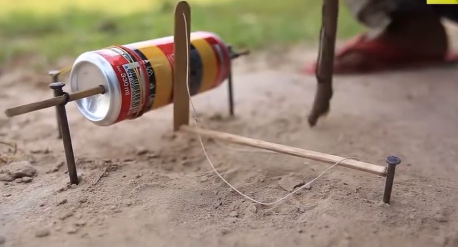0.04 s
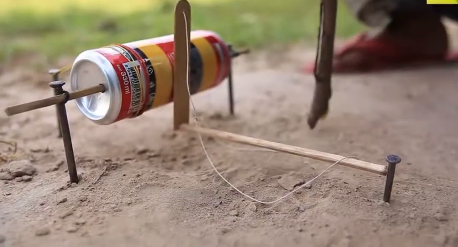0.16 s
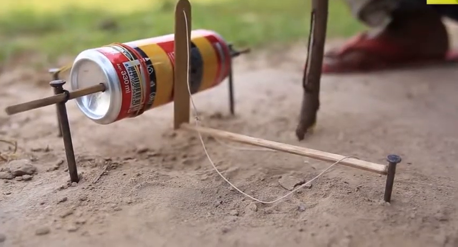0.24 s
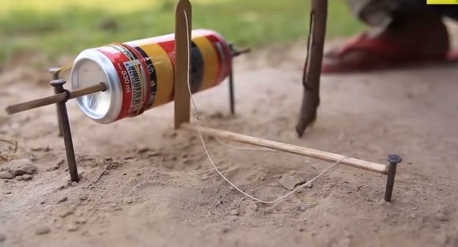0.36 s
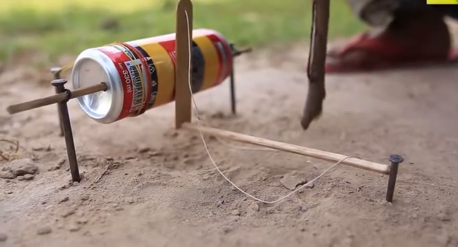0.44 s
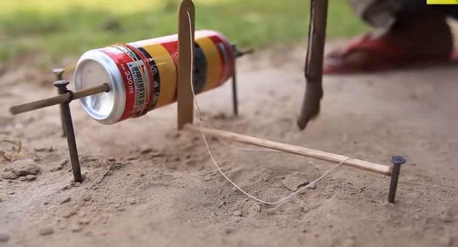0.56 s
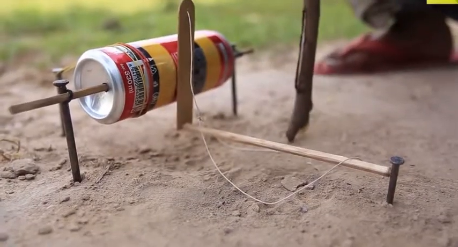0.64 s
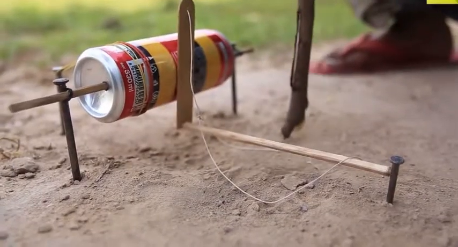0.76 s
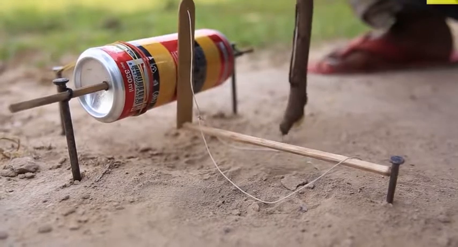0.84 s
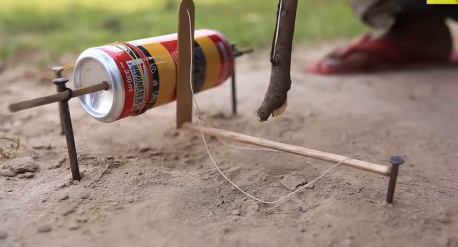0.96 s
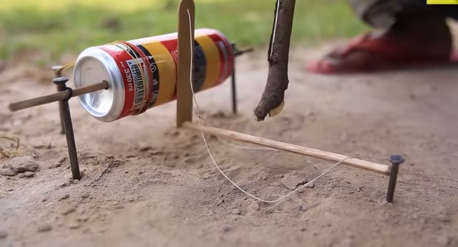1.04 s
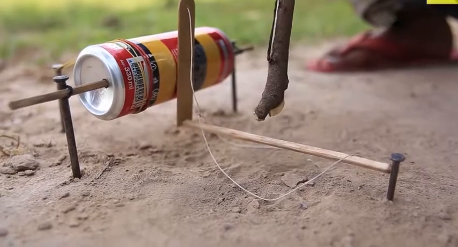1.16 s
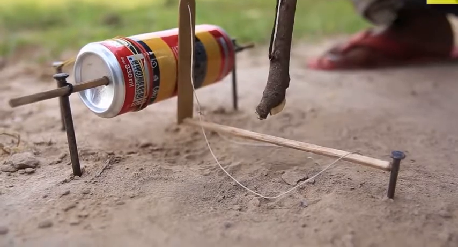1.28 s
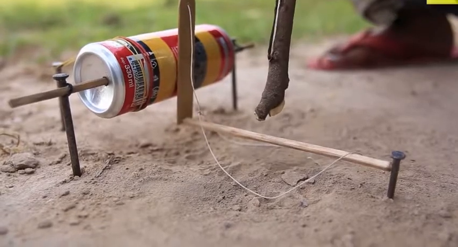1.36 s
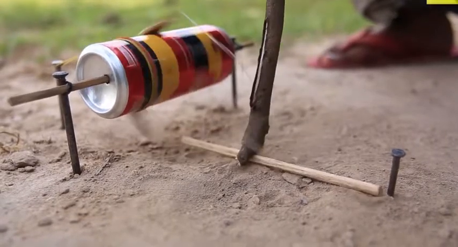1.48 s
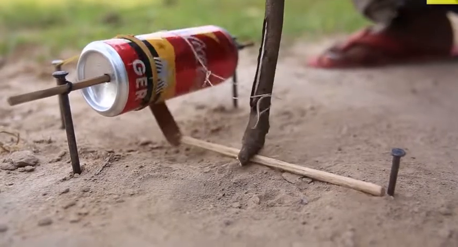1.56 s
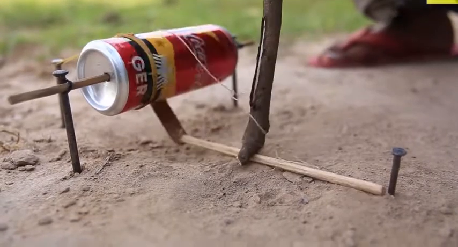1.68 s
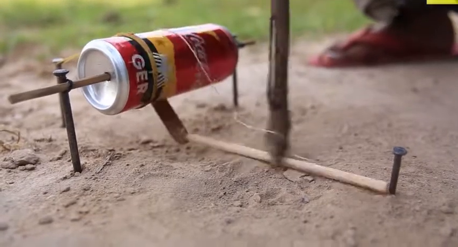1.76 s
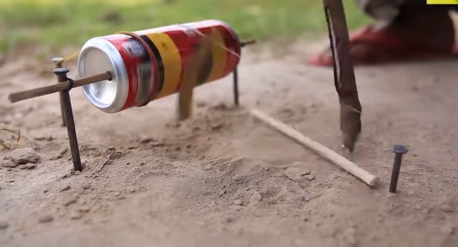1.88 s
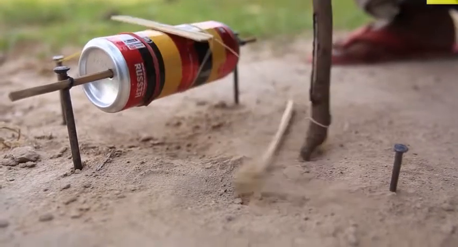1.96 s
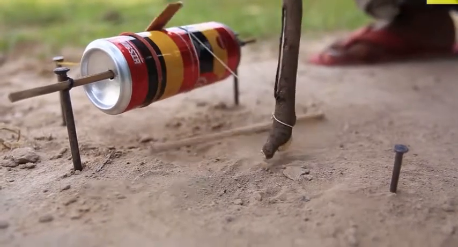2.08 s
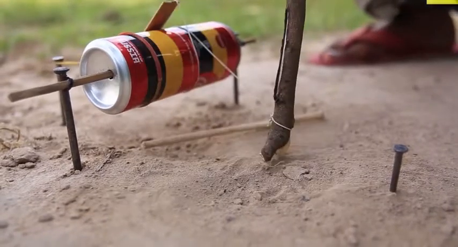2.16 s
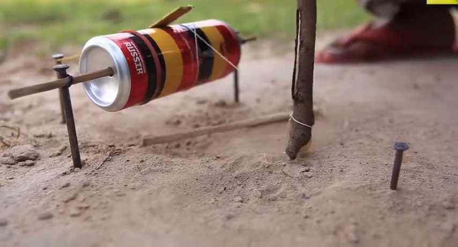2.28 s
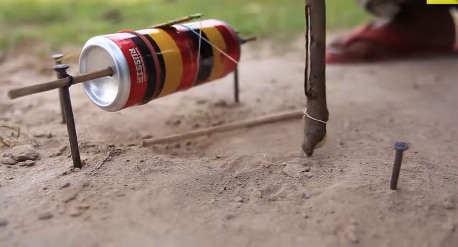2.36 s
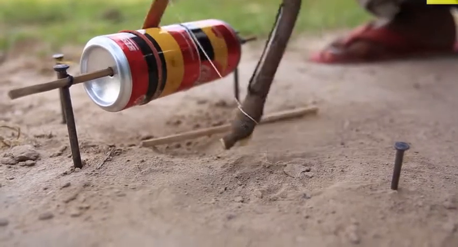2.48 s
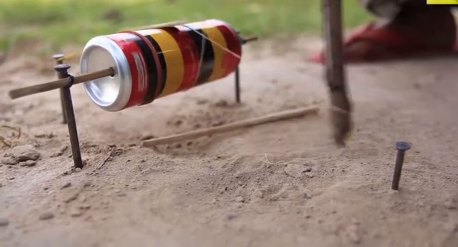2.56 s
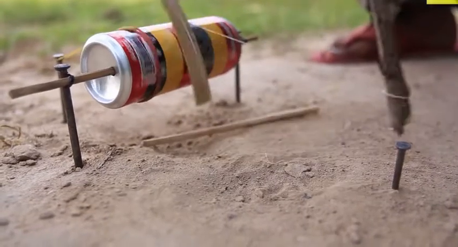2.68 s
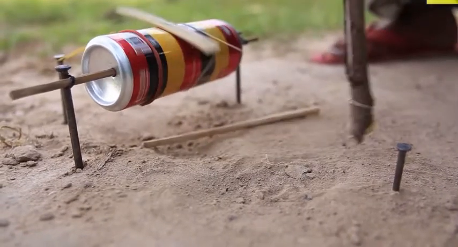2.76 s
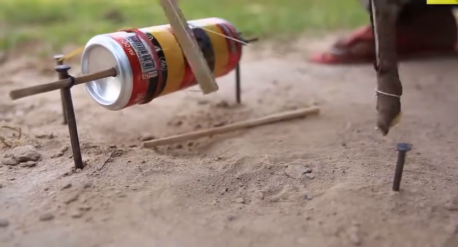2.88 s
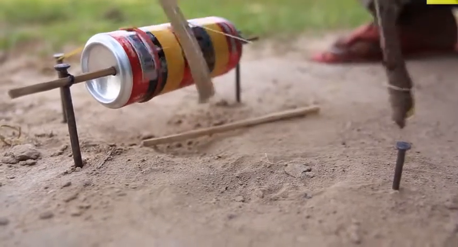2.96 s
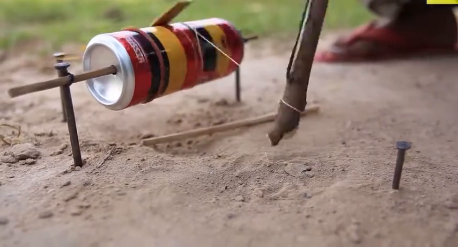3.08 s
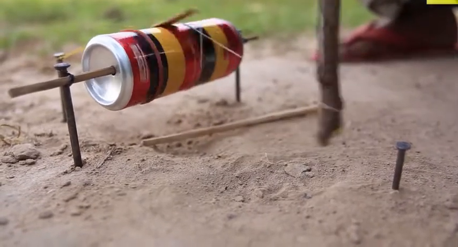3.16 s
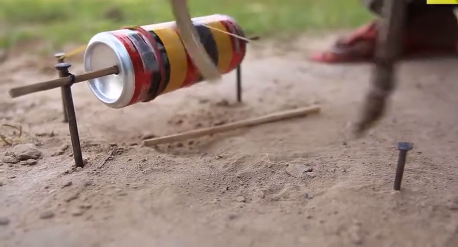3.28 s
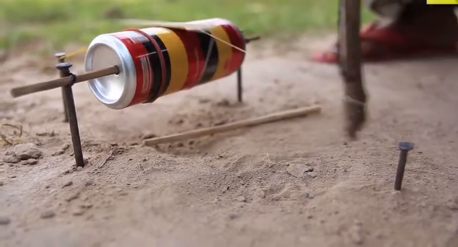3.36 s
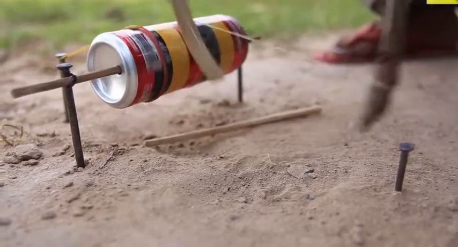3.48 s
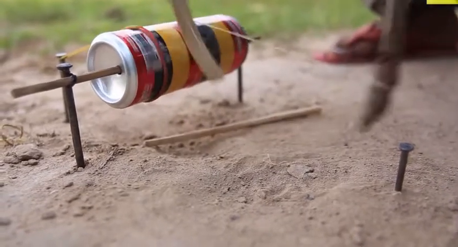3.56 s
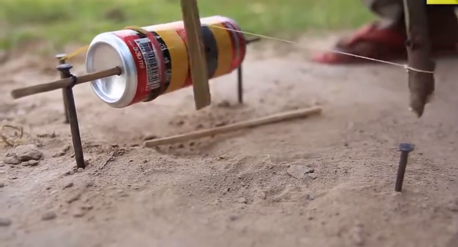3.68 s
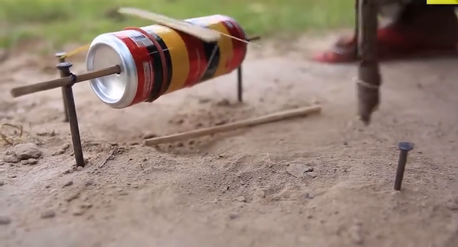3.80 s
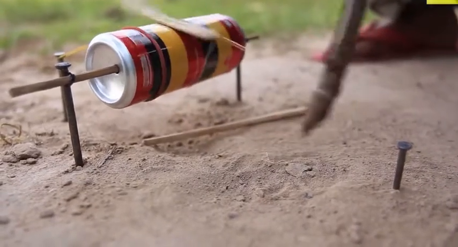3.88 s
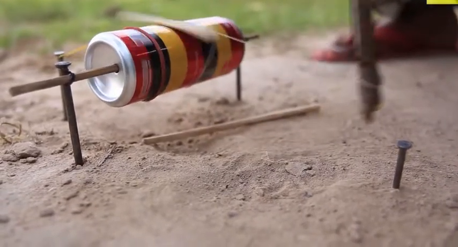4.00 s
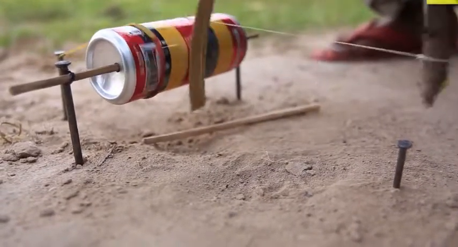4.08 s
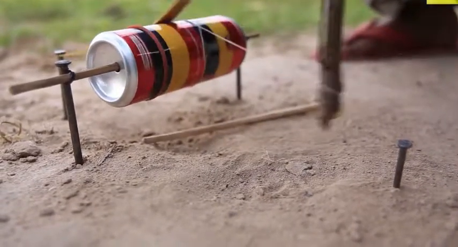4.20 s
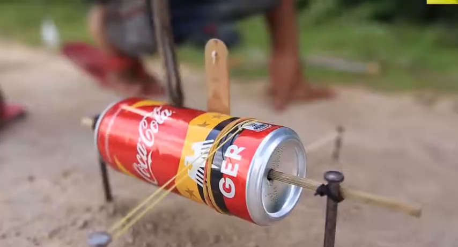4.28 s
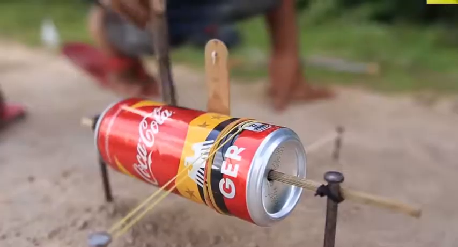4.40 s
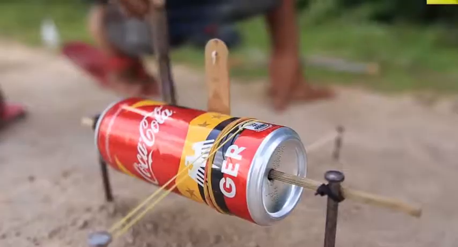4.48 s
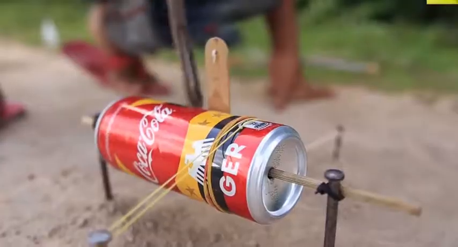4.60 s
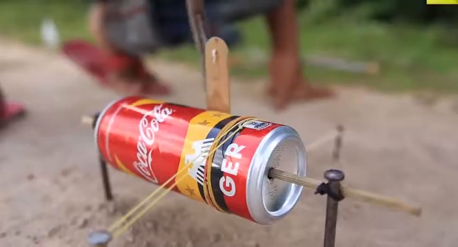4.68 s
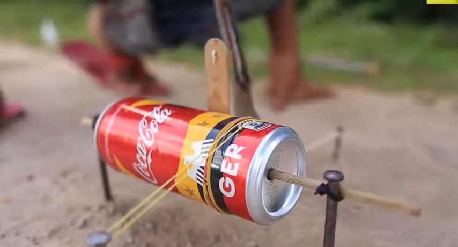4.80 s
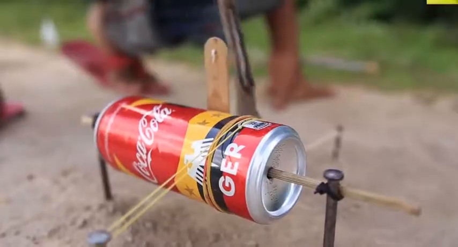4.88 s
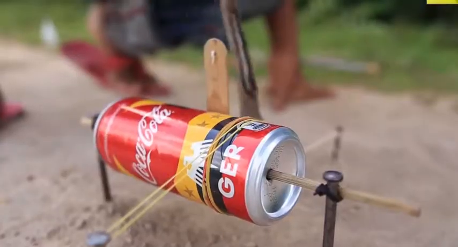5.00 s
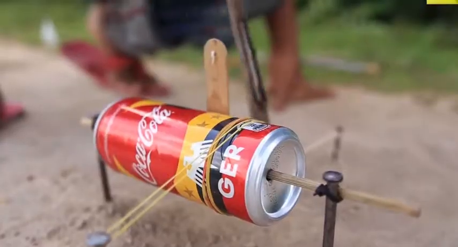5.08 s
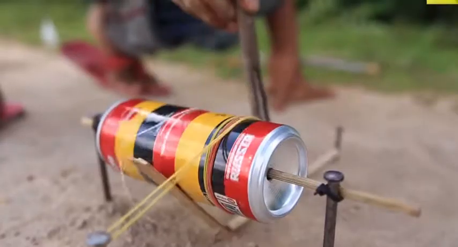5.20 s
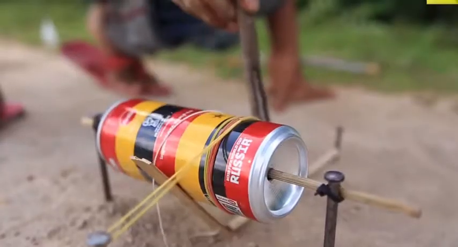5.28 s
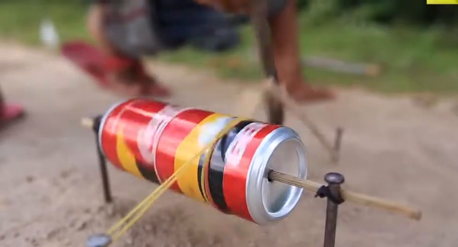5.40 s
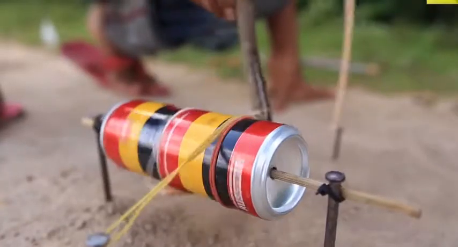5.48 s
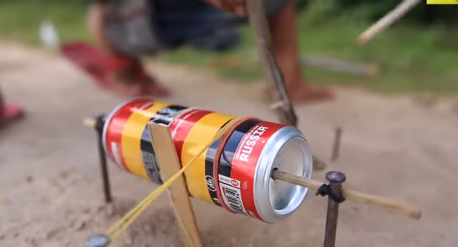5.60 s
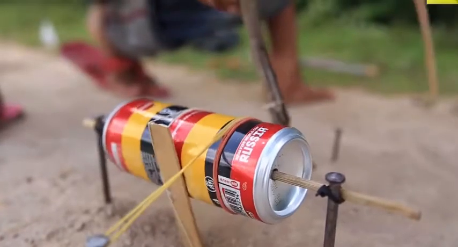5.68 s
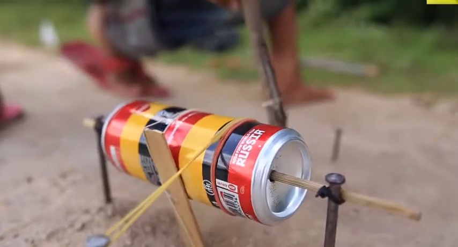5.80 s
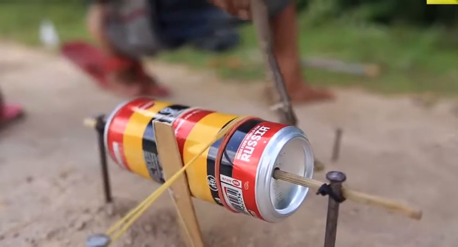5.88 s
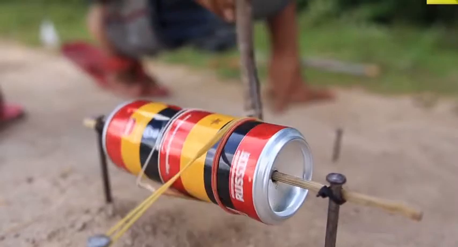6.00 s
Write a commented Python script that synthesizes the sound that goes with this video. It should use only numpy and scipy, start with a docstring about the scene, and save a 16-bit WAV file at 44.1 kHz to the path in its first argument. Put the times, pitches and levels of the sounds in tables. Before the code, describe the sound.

Faint grit taps, then a wooden arm slams a hollow metal can, which rocks and rattles; later a second, brighter can snaps twice and settles.

```python
"""Faint taps in the grit come first; then a can trap on a wooden axle, wound with rubber bands, slams its arm down.
Its string rocks it to and fro, so the can knocks, rattles and scrapes on its axle; bands twang and the stick clatters.
After one dry squeak of the axle a second, brighter-ringing trap slams hard, then again more softly, and knocks to rest.
Blows and rubs excite filters shaped like each can, bands and squeak are sines, and grit is bursts of tiny contacts.
Loud peaks are flattened at the input; a faint yard scatter and soft steady background noise lie behind."""
import sys
import numpy as np
from scipy import signal
from scipy.fft import rfft, irfft
from scipy.io import wavfile
from scipy.ndimage import uniform_filter1d

SR = 44100
rng = np.random.default_rng(int(sys.argv[2]) if len(sys.argv) > 2 else 0)


def materialize(psi):
    """Save the field psi as 16-bit PCM at rate SR to the path in sys.argv[1].

    A 1-D psi becomes a single channel; in a 2-D psi each row is a channel.
    """
    bounded = np.clip(np.atleast_2d(psi).T, -1, 1)
    quanta = np.round(bounded * 32767).astype(np.int16)
    wavfile.write(sys.argv[1], SR, quanta)


N = 266805

# Slams of the arm: (time [s], hollow body [dB], wall clang [dB re body], rim tick [dB re body],
# chatter t60 [s], ground thump [dB], free wall ringing [dB])
ARM_SLAMS = [(1.5824, -3.5, 5.5, -4, 0.049, -7, -11), (5.2236, -9.5, 12, 2, 0.049, -23, -5.5),
             (5.5999, -11, 2.5, -4, 0.042, -34, -32)]
# Falls of the can against its axle: (time [s], body [dB], hardness as rim tick [dB re body], chatter t60 [s])
CAN_FALLS = [(1.519, -35.5, -15, 0.091), (1.563, -18, -15.5, 0.053), (1.629, -29, -17, 0.079),
             (1.931, -30, -17, .023), (1.97, -34.5, 7.5, 0.062), (1.992, -20.5, -20, .025),
             (2.015, -28.5, -8, 0.1), (2.191, -43, -33, 0.042), (2.534, -39, -26.5, 0.023),
             (2.635, -34.5, -26, 0.069), (2.768, -37, -20, .06), (2.801, -22, -18, 0.028),
             (2.989, -42.5, -32, 0.022), (3.119, -31, -17.5, 0.037), (3.145, -23.5, -20, .045),
             (3.208, -36.5, -21, 0.04), (3.251, -25.5, -18, 0.054), (3.411, -19, -16, 0.036),
             (3.458, -30.5, -18, .03), (3.489, -27.5, -18.5, 0.098), (3.59, -33.5, -17, 0.02),
             (3.626, -21.5, -24.5, 0.031), (3.811, -35.5, -30, 0.021), (3.862, -35, -27.5, 0.032),
             (3.98, -35.5, -14.5, .06), (4.008, -24.5, -18, 0.039), (4.068, -34, -14, 0.037),
             (4.106, -28, -17, 0.032), (4.187, -27, -18.5, .03), (4.224, -24.5, -22.5, 0.036),
             (4.279, -37.5, -23.5, .022), (5.183, -26, 1, 0.063), (5.203, -17.5, -16, 0.047),
             (5.26, -19.5, -4, 0.051), (5.27, -28.5, 5.5, 0.027), (5.451, -38, 7.5, 0.081),
             (5.5, -21.5, -0.5, 0.062), (5.547, -29, -5.5, 0.063), (5.559, -29, -7, 0.034),
             (5.593, -26.5, 8, 0.018), (5.633, -27.5, 0.5, 0.044), (5.647, -18.5, -12, 0.026),
             (5.791, -39, -16.5, 0.018), (5.826, -36.5, -22, 0.05), (5.85, -36.5, -13, .03),
             (5.89, -33, -11.5, 0.03), (5.907, -26.5, -13, .035), (5.944, -32, -7.5, 0.058),
             (6.009, -34.5, -12.5, 0.051), (6.043, -35.5, 6.5, 0.03)]
# Swings of the can, rubbing and rattling on its axle: (start [s], end [s], level before layer trims [dB])
CAN_TURNS = [(1.505, 1.652, -25.5), (1.894, 2.088, -34.5), (2.621, 2.717, -37), (2.739, 2.893, -38),
             (3.076, 3.191, -39), (3.207, 3.298, -35.5), (3.345, 3.536, -37.5), (3.532, 3.731, -38),
             (3.976, 4.15, -38), (4.149, 4.268, -36), (5.167, 5.269, -24.5), (5.428, 5.493, -40),
             (5.516, 5.669, -28), (6.016, 6.082, -28)]
# Creep kept up by the string beneath the turns: (start [s], end [s], level before scrape trim [dB])
STRING_CREEP = (2.5, 4.28, -50.5)
# Broad colour of each can: (frequency [Hz], gain [dB])
FIRST_CAN_COLOUR = [(30, -29), (110, -12.5), (200, -13), (350, -6), (500, 0.5), (800, 2), (1020, 0),
                    (1330, -11.5), (1800, -7.5), (2300, -8.5), (2700, -23), (4400, -27), (8000, -37.5),
                    (15000, -58)]
SECOND_CAN_COLOUR = [(30, -30.5), (150, -19), (300, -4), (450, -1.5), (750, 1), (1100, 3.5), (1450, -5),
                     (1900, 0.5), (2750, 3), (3200, -18.5), (4900, -12), (7000, -18), (10500, -22),
                     (15000, -39.5)]
# Resonances of each can: (frequency [Hz], undamped width [Hz],
# height over the colour before damping and scatter [dB], relative level in free ringing [dB])
FIRST_CAN_MODES = [(359, 45, 7.5, -25), (497, 50, 3.5, -33), (600, 15, -0.5, -5), (697, 7, 7, -10.5),
                   (773, 120, 1, -25.5), (957, 65, 6.5, -30.5), (1136, 13.4, -4, 1.5), (1462, 17, -7, 3),
                   (1700, 51, -2, -9), (2127, 19, 10.5, -11.5), (2210, 9.4, -4.5, -15.5),
                   (3220, 87, 1.5, -33), (4136, 110, 6.5, -27), (4600, 90, 1.5, -28.5),
                   (5750, 330, 9, -28.5)]
SECOND_CAN_MODES = [(663, 17, 3.5, -32), (735, 8.9, 7, 0.5), (862, 8.8, 3, -3.5), (1090, 24, 7, -19),
                    (1360, 45.2, 4, -25), (1425, 10, -16, -13), (1601, 73, -4.5, -19),
                    (1657, 13.7, -8, 5.5), (1805, 14.6, 2, 8.5), (1885, 37, 10.5, 5),
                    (2204, 28, 4.5, -16.5), (2476, 22, -2, -28), (2700, 39, 5.5, -21),
                    (2790, 25, 3.5, -12.5), (5560, 64, -15, -34)]
# Jerks of the rubber bands: (time [s], pitch [Hz], level [dB])
BAND_TWANGS = [(1.515, 272, -33.5), (1.628, 252, -29), (1.844, 269, -39), (5.184, 328, -24),
               (5.27, 308, -26.5), (5.452, 308, -35.5), (5.499, 301, -30), (5.646, 328, -34.5)]
# Knocks of the trigger stick: (time [s], level [dB])
TRIGGER_HITS = [(1.519, -28), (1.8425, -36.5), (1.866, -38), (1.972, -21), (2.131, -39.5), (2.152, -47.5)]
# Resonances of the stick: (frequency [Hz], width [Hz], height over the grit colour [dB])
TRIGGER_MODES = [(563.4, 39, 14), (1470, 29, 32.5), (1810, 150, 21), (4440, 400, -2)]
# Faint taps of wood in the grit: (time [s], level [dB])
GRIT_TAPS = [(0.324, -54), (.703, -49), (1.860, -45.5), (1.880, -39.5), (2.171, -48.5), (2.354, -53.5),
             (4.456, -47)]
# Broad colour of the grit: (frequency [Hz], gain [dB])
GRIT_COLOUR = [(60, -6.5), (230, -1.5), (600, 0), (2500, -13), (8000, -15), (15000, -27.5)]
# One dry squeak of the axle: (centre pitch [Hz], level [dB])
AXLE_SQUEAK = (2700, -45)
# Fade of the yard's scatter: (frequency [Hz], t60 [s])
YARD_FADE = [(150, 0.296), (700, 0.17), (2500, 0.37), (6000, 0.32), (14000, 0.23)]
# Spectrum of the background noise: (frequency [Hz], relative density [dB per Hz])
BACKGROUND_COLOUR = [(15, -40.5), (25, -1.5), (87, -3.5), (285, -2.5), (335, -5), (545, -5.5), (1370, -11),
                     (1890, -12), (2110, -13), (2690, -12.5), (3160, -14), (14400, -18), (16000, -17.5)]
# Left-right likeness of the background noise: (frequency [Hz], likeness [0-1])
BACKGROUND_LIKENESS = [(60, 0.91), (240, 0.97), (950, 0.97), (3770, 0.76), (15000, 0.24)]

SECOND_CAN_FROM_S = 4.4
SIZE = 16384  # length of one short sound [samples]
HZ = np.fft.rfftfreq(SIZE, 1 / SR)
T = np.arange(SIZE) / SR


def snaps(thump_hz=200, thump_t60=0.031):
    """The arm's slam cracks against the can, thumps the ground and leaves the thin wall ringing."""
    out = np.zeros(N)
    for s, *strike, thump_db, ring_db in ARM_SLAMS:
        can = can_at(s, held=1.2)
        add(out, s, blow(can, *strike, touch_db=-10.5, rebound_db=-16.0, seat_s=0.0002))

        noise = rng.standard_normal(SIZE)
        soil = signal.sosfilt(signal.butter(2, thump_hz, fs=SR, output="sos"), noise)
        add(out, s, at_level(soil * decay(thump_t60), thump_db))

        wall = np.zeros(SIZE)
        for hz, width, _, db in can_in_use(s)[1]:
            fade = np.exp(-np.pi * width * T)  # a narrow mode rings longer
            wall += gain_of(db) * fade * np.sin(2 * np.pi * hz * T)
        add(out, s, at_level(wall, ring_db))
    return out


def knocks():
    """The loose can falls against its axle."""
    out = np.zeros(N)
    for s, *strike in CAN_FALLS:
        add(out, s, knock(s, *strike))
    return out


def knock(s, body_db, hardness_db, t60, held=0.25, clang_db=6.5, clang_per_hardness=0.63):
    """One fall of the can on its axle: the harder the contact, the more wall clang and rim tick."""
    clang_db = clang_db + clang_per_hardness * hardness_db
    return blow(can_at(s, held, spread_db=7.5), body_db, clang_db, hardness_db, t60)


def blow(can, body_db, clang_db, tick_db, t60, touch_db=-9, rebound_db=-7, rebound_s=0.0036,
         seat_s=0.0023, split_hz=(1300, 3200)):
    """A first touch, a rebound across the axle's play and a dying chatter set the can ringing."""
    onset = 1 - np.exp(-T / max(seat_s, 0.0001))
    push = contacts(SIZE, per_s=5000, spread_db=5) * onset * decay(max(t60, 0.005))
    push /= np.linalg.norm(push)
    push[0] += gain_of(touch_db)
    rebound_at = round(rebound_s * rng.uniform(0.85, 1.15) * SR)
    push[rebound_at] -= gain_of(rebound_db)
    ring = signal.fftconvolve(push, can)[:SIZE]

    # where and how hard the can is struck sets the shares of hollow body, wall clang and rim tick
    body = signal.sosfilt(signal.butter(5, split_hz[0], "low", fs=SR, output="sos"), ring)
    clang = signal.sosfilt(signal.butter(3, split_hz, "band", fs=SR, output="sos"), ring)
    tick = signal.sosfilt(signal.butter(7, split_hz[1], "high", fs=SR, output="sos"), ring)
    struck = at_level(body, body_db)
    struck += at_level(clang, body_db + clang_db)
    struck += at_level(tick, body_db + tick_db)
    return struck


def can_at(s, held=0, spread_db=2):
    """The can's response to one contact: rubbing damps its modes, and each spot stresses others."""
    shell, modes = can_in_use(s)
    hz, width, db, _ = np.transpose(modes)
    damping = 1 + max(held, 0)
    scatter_db = rng.uniform(-spread_db, spread_db, len(hz))
    db = db + scatter_db - 20 * np.log10(damping)
    return response(shell, zip(hz, width * damping, db))


def can_in_use(s):
    """Picks the shell colour and modes of the can that is being worked at time s."""
    if s > SECOND_CAN_FROM_S:
        return SECOND_CAN_COLOUR, SECOND_CAN_MODES
    return FIRST_CAN_COLOUR, FIRST_CAN_MODES


def rattle(hops_per_s=42, trim_db=-2.5, spread_db=5, hardness_db=-17, t60=0.019, ends_db=-6):
    """While it turns, the can hops on the axle at uneven intervals, on the whole loudest in mid-swing."""
    out = np.zeros(N)
    for start, end, db in CAN_TURNS:
        count = max(round((end - start) * hops_per_s), 1)
        for k, (late, size) in enumerate(rng.random((count, 2))):
            along = (k + 0.5 + late) / (count + 2)  # share of the turn gone by
            hop_db = db + trim_db
            hop_db += spread_db * (2 * size - 1)
            hop_db += ends_db * (2 * along - 1) ** 2
            s = start + (end - start) * along
            add(out, s, knock(s, hop_db, hardness_db, t60, held=0.54))
    return out


def scrapes(dull_hz=8000, trim_db=-1.5, ramp_s=0.018):
    """The rim of the hole sticks and slips on the wood; the slips sound through the can."""
    out = np.zeros(N)
    for start, end, db in CAN_TURNS + [STRING_CREEP]:
        t = np.arange(start, end, 1 / SR)
        ramp = np.clip(np.minimum(t - start, end - t) / ramp_s, 0, 1)
        slips = contacts(len(t), per_s=600, spread_db=2.5) * ramp
        soft = signal.sosfilt(signal.butter(1, dull_hz, fs=SR, output="sos"), slips)
        rub = signal.fftconvolve(soft, can_at(start, held=0.79, spread_db=7.5))
        loudness = np.std(rub[:len(t)]) + 1e-12
        add(out, start, gain_of(db + trim_db) * rub / loudness)
    return out


def twangs(rise_s=0.0043, t60=0.055):
    """Taut rubber gives one low, quickly damped note."""
    out = np.zeros(N)
    swell = (1 - np.exp(-T / rise_s)) * decay(t60)
    for s, hz, db in BAND_TWANGS:
        add(out, s, at_level(swell * np.sin(2 * np.pi * hz * T), db))
    return out


def taps(rows, body, t60):
    """Wood lands on grit: a short crunch heard through the given body."""
    out = np.zeros(N)
    for s, db in rows:
        crunch = contacts(SIZE, per_s=1500, spread_db=-1.0) * decay(t60)
        add(out, s, at_level(signal.fftconvolve(crunch, body), db))
    return out


def squeak(at_s=4.682, length_s=0.02, waver=0.068):
    """The wound axle slips once with a tiny unsteady chirp."""
    out = np.zeros(N)
    hz, db = AXLE_SQUEAK
    drift = evened(uniform_filter1d(rng.standard_normal(SIZE), size=40))
    pitch = hz * (1 + waver * drift)
    swell = np.sin(np.pi * np.sqrt(np.minimum(T / length_s, 1))) ** 2  # quick rise, slower fall
    chirp = swell * np.sin(2 * np.pi * np.cumsum(pitch) / SR)
    add(out, at_s, at_level(chirp, db))
    return out


def yard(x, build_s=0.005):
    """Scatter from ground and trees: a noise tail that fades at its own pace in each band."""
    hz, t, z = signal.stft(rng.standard_normal(SIZE * 2), SR, nperseg=256)
    fade = gain_of(-60 * t / read(YARD_FADE, hz)[:, None])
    fade = fade * (1 - np.exp(-t / build_s))
    tail = signal.istft(z * fade, SR, nperseg=256)[1]
    return signal.fftconvolve(x, tail / np.linalg.norm(tail))[:N]


def background(level_db=-54):
    """Soft steady background noise, left and right less alike up high."""
    hz = np.fft.rfftfreq(N, 1 / SR)
    common, apart = rfft(rng.standard_normal((2, N)))
    same = np.clip(read(BACKGROUND_LIKENESS, hz), 0, 1)
    mid = np.sqrt(1 + same) * common
    side = np.sqrt(1 - same) * apart
    ears = np.array([mid + side, mid - side])
    hush = irfft(ears * gain_of(read(BACKGROUND_COLOUR, hz)), N)
    return gain_of(level_db) * evened(hush)


def response(shell, modes=()):
    """Causal impulse response of a body: a broad colour with narrow resonances standing on it."""
    peaks = sum(gain_of(db) ** 2 / (1 + (2 * (HZ - hz) / width) ** 2) for hz, width, db in modes)
    log_gain = np.log(gain_of(read(shell, HZ)) * np.sqrt(1 + peaks))
    circle = np.concatenate([log_gain, log_gain[-2:0:-1]])
    # minimum phase: the energy comes as early as the colour allows
    spectrum = np.exp(np.conj(signal.hilbert(circle)))
    return np.fft.ifft(spectrum).real


def contacts(count, per_s, spread_db):
    """Random tiny contacts of uneven size and either sign, at unit RMS."""
    chance = rng.random(count)
    size = rng.standard_normal(count)
    sign = rng.choice([-1, 1], count)
    happens = chance < per_s / SR
    return evened(happens * sign * gain_of(spread_db * np.clip(size, -2, 2)))


def decay(t60):
    """Exponential fade that loses 60 dB in t60 seconds."""
    return gain_of(-60 * T / t60)


def gain_of(db):
    """Decibels to amplitude."""
    return 10 ** (np.asarray(db) / 20)


def evened(x):
    """Scales a sound to unit RMS."""
    return x / np.sqrt(np.mean(x ** 2) + 1e-20)


def at_level(x, db):
    """Scales a short sound so that its energy, spread over 20 ms, has the given level."""
    return gain_of(db) * x / np.sqrt(np.sum(x ** 2) / (0.02 * SR) + 1e-20)


def read(points, hz):
    """A table's value at hz, on a log-frequency axis."""
    f, value = np.transpose(points)
    return np.interp(np.log(hz + 1), np.log(f + 1), value)


def add(mix, s, sound):
    """Lays a sound into the mix at time s, cut off at the mix's end."""
    part = mix[round(s * SR):][:len(sound)]
    part += sound[:len(part)]


def scene(yard_db=-30):
    """The traps sound straight ahead, alike in both ears, over the background noise."""
    trap = snaps() + knocks() + rattle() + scrapes() + twangs()
    trap += taps(TRIGGER_HITS, response(GRIT_COLOUR, TRIGGER_MODES), t60=0.053)
    trap += taps(GRIT_TAPS, response(GRIT_COLOUR), t60=0.065)
    trap += squeak()
    return trap + gain_of(yard_db) * yard(trap) + background()


def record(dry, ceiling=0.85, edge_hz=16100):
    """The loudest peaks overload the input and are flattened; then the treble is cut at the band edge."""
    clipped = dry / (1 + (dry / ceiling) ** 8) ** (1 / 8)
    band_limit = signal.firwin(511, edge_hz, window=("kaiser", 8), fs=SR)
    return signal.oaconvolve(clipped, band_limit[None], "same")


dry = scene()
out = record(dry)
materialize(out)
```